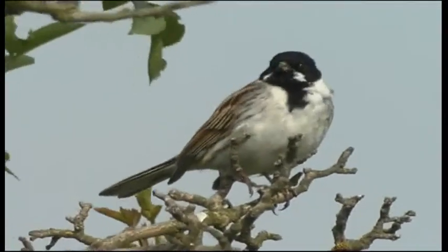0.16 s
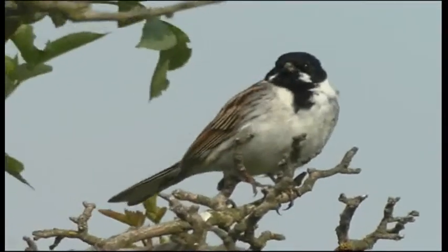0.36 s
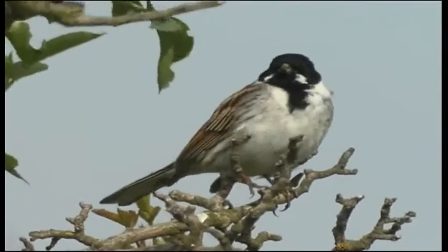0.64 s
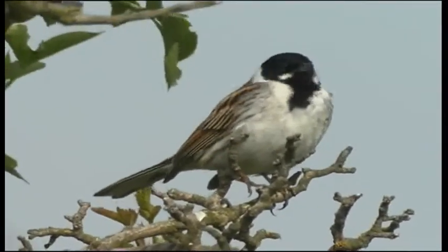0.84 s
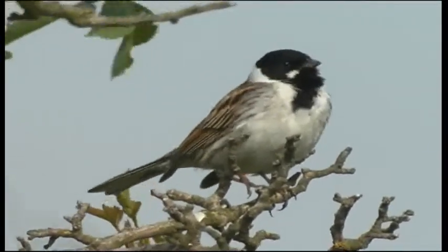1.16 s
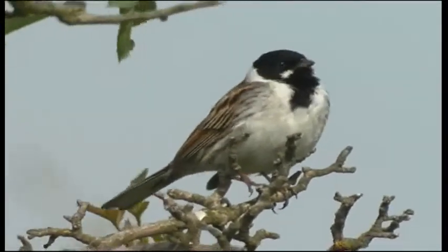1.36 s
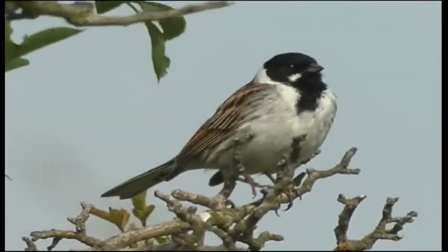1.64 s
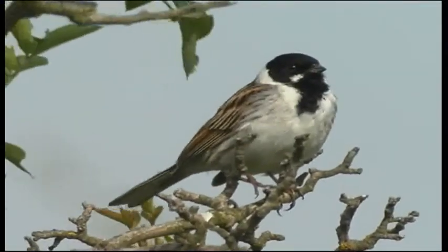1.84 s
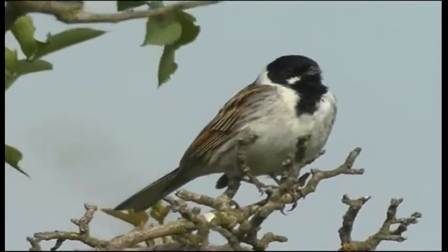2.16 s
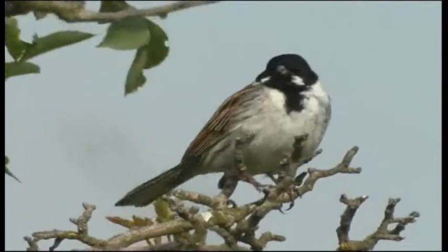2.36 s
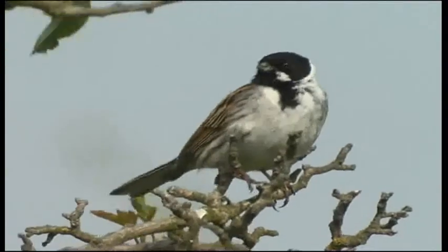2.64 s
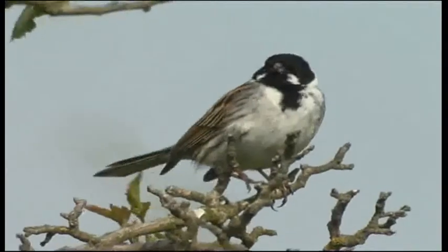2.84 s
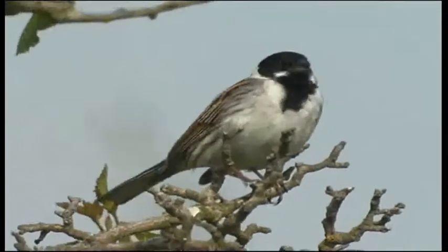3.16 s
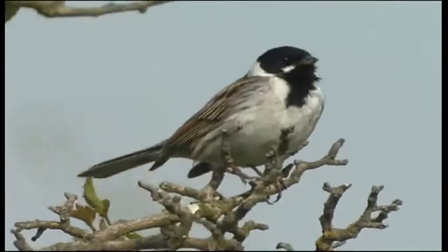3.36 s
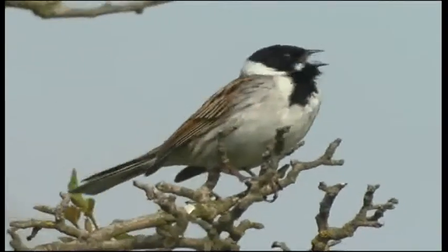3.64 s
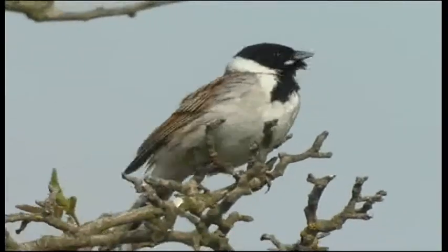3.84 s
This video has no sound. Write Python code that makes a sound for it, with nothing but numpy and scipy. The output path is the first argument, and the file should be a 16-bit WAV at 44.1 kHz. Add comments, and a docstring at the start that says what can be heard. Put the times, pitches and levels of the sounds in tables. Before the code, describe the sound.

A small bird close by on a hedge top gives two thin, high falling calls about two seconds apart, then a louder rasping buzz; faint far chirps, low wind rumble and hiss, open air, distant-feeling microphone.

```python
"""Light wind rumbles over a distant rush that swells slowly, with a steady hiss, all shaped noise; dry rustles tick.
A small bird on a hedge top gives two thin falling calls, about two seconds apart: a sine whistle slides down
while a second sine scoops up under it. Between the calls, during the second and at the end of the buzzing note,
other birds chirp faintly from far off in short, mostly trilled slides. That note is the near bird's last and
louder one, a fast pitch trill that ends on a clear tone."""
import sys
import numpy as np
from scipy import signal
from scipy.fft import rfft, irfft, next_fast_len
from scipy.io import wavfile
from scipy.ndimage import map_coordinates

SR = 44100
rng = np.random.default_rng(int(sys.argv[2]) if len(sys.argv) > 2 else 0)


def dump(signal):
    """Clip the signal to [-1, 1] and save it as 16-bit WAV at the path in sys.argv[1]."""
    limited = np.clip(np.atleast_2d(signal).T, -1, 1)
    pcm = np.round(limited * 32767).astype(np.int16)
    wavfile.write(sys.argv[1], SR, pcm)


N = 176400  # samples: four seconds
T = np.arange(N) / SR


def amp(db):
    """Decibels to gain."""
    return 10 ** (np.asarray(db) / 20)


def unit(x):
    """Scale to rms 1."""
    return x / np.sqrt(np.mean(x ** 2) + 1e-20)


def curves(rows, t):
    """Each column after the time, read at times t."""
    knot_times, *columns = np.transpose(rows)
    return [np.interp(t, knot_times, column) for column in columns]


def wobble(rate):
    """A smooth random curve, rate knots a second."""
    knots = rng.standard_normal(int(N * rate / SR) + 4)
    return map_coordinates(knots, [T * rate])


def filtered(x, response):
    """x with its spectrum multiplied by a response of frequency, padded by at least half a second."""
    size = next_fast_len(N + SR // 2)
    hz = np.fft.rfftfreq(size, 1 / SR)
    return irfft(rfft(x, size) * response(hz), size)[:N]


def noise(colour):
    """White noise shaped to a (Hz, dB) spectrum, then scaled to rms 1."""
    knot_hz, knot_db = np.transpose(colour)

    def response(hz):
        return amp(np.interp(np.log(hz + 1), np.log(knot_hz), knot_db))

    return unit(filtered(rng.standard_normal(N), response))


def gate(t, length, attack, release):
    """Smooth attack, hold and release between t = 0 and length."""
    ramp = np.minimum(t / attack, (length - t) / release)
    return np.sin(np.pi / 2 * np.clip(ramp, 0, 1)) ** 2


def voice(hz, jitter):
    """One side of the syrinx: a sine of rms 1 whose pitch trembles by the share jitter."""
    trembling_hz = hz * (1 + jitter * wobble(700))
    phase = 2 * np.pi * np.cumsum(trembling_hz) / SR
    return np.sqrt(2) * np.sin(phase)


# Wind rumble over time. Each row: time in seconds, level in dB before the unsteadiness.
WIND_LEVEL = [(0, -51), (.18, -49), (.29, -47.5), (.5, -52.5), (1.0, -53.5), (1.27, -52), (1.65, -53),
              (1.92, -50.5), (2.27, -55.5), (2.43, -52), (2.6, -56.5), (2.8, -55), (3.1, -57.5),
              (3.5, -61.5), (4, -54)]
# Tone of the rumble. Each row: frequency in Hz, relative level in dB.
WIND_COLOUR = [(20, -32), (45, -30.5), (70, -25), (100, -12), (130, -4), (160, -1), (200, 2.5), (270, -6),
               (340, -5), (450, -14.5), (800, -17), (3000, -64)]
# Brighter puffs of wind. Each row: time of the crest in seconds, half width in seconds, crest level in dB.
PUFFS = [(.29, .035, -48), (.35, 0.33, -59), (1.25, 0.22, -56.5)]
# Tone of the puffs. Each row: frequency in Hz, relative level in dB.
PUFF_COLOUR = [(20, -55), (200, -23), (340, -6), (500, -13), (700, -36), (2000, -50)]
# The distant rush over time. Each row: time in seconds, level in dB before the unsteadiness.
RUSH_LEVEL = [(0, -57), (1.0, -57.5), (1.7, -55), (2.3, -56), (2.8, -54.5), (3.3, -51), (4, -47.5)]
# Tone of the rush. Each row: frequency in Hz, relative level in dB.
RUSH_COLOUR = [(20, -36), (60, -23), (130, 0.5), (300, -4), (750, -2), (1200, -5.5), (2000, -13.5),
               (3500, -17), (7000, -24.5), (12000, -56)]
# Tone of the steady hiss. Each row: frequency in Hz, relative level in dB.
HISS_COLOUR = [(20, -23), (300, 0.5), (2000, 0.5), (4000, -1.5), (6300, -5.5), (8500, -6), (10000, -10),
               (11000, -21.5)]
HISS_DB = -59


def air():
    """Shaped noise: unsteady wind rumble with brighter puffs, a swelling far rush and an even hiss."""
    wind_db = curves(WIND_LEVEL, T)[0] + 0.73 * wobble(16)
    wind = amp(wind_db) * noise(WIND_COLOUR)
    puff_swell = sum(amp(db) * np.exp(-((T - s) / width) ** 2) for s, width, db in PUFFS)
    puffs = puff_swell * noise(PUFF_COLOUR)
    rush_db = curves(RUSH_LEVEL, T)[0] + 0.15 * wobble(6.19)
    rush = amp(rush_db) * noise(RUSH_COLOUR)
    return wind + puffs + rush + amp(HISS_DB) * noise(HISS_COLOUR)


# Faint dry rustles and ticks. Each row: start in seconds, length in seconds, level in dB.
RUSTLES = [(0.848, .02, -56.5), (0.869, .02, -55), (0.926, .035, -59), (1.201, .002, -51),
           (1.484, .012, -56.5), (1.503, .01, -57), (2.995, .005, -58), (3.063, .003, -50.5),
           (3.326, .085, -53.5)]
# Tone of the rustles. Each row: frequency in Hz, relative level in dB.
RUSTLE_COLOUR = [(100, -60), (1500, -27), (3500, 2), (7000, 5), (10000, -3.5), (12000, -31)]


def rustles():
    """Brief dry brushing at the perch: bright noise let through in short bursts."""
    bursts = sum(amp(db) * gate((T - s) / length, 1, 0.067, 0.23) for s, length, db in RUSTLES)
    return bursts * noise(RUSTLE_COLOUR)


# The falling calls. Each row: start in seconds, whistle level in dB, delay of the second voice in seconds,
# level of the second voice in dB before the softer first scoops.
FALLS = [(1.04, -31, .0715, -31.5), (3.235, -33, .0615, -31.5)]
# The whistle of one call. Each row: seconds from the call's start, pitch in Hz, level in dB relative to the call.
WHISTLE = [(0, 7250, -35), (.03, 6780, -17), (.05, 6420, -8), (.06, 6250, -8), (.072, 6050, -1.5),
           (.1, 5550, -3.5), (.128, 5150, -2), (.155, 4850, 0), (.178, 4700, -3), (.189, 4620, -20)]
# the second voice repeats a scoop at a fixed gap
SCOOP_COUNT = 6
SCOOP_GAP_S, SCOOP_S, SCOOP_RISE_S, SCOOP_ATTACK_S = .0154, .0135, .006, .0028
SCOOP_FROM_HZ, SCOOP_RISE_HZ = 3900, 1250  # start of the late scoops, and the climb they tend towards
FIRST_SCOOP_HZ, FIRST_SCOOP_DB, SETTLE_S = 900, -7, .028  # early scoops sit higher and softer, then settle
WHISTLE_JITTER, SCOOP_JITTER, FLUTTER_DB = 0.0023, .018, 0.8  # unsteadiness of pitch (share) and of level
COUPLED_JITTER = .015  # share added to the whistle's jitter while both voices sound


def falling_calls():
    """Two sides of the syrinx at once: one slides down while the other scoops up six times."""
    out = np.zeros(N)
    span = SCOOP_COUNT * SCOOP_GAP_S
    for start, db, delay, scoop_db in FALLS:
        whistle_hz, whistle_db = curves(WHISTLE, T - start)
        t = np.clip(T - start - delay, 0, span)  # time since the second voice came in
        within = t % SCOOP_GAP_S  # time within the current scoop
        early = np.exp(-t / SETTLE_S)
        both = gate(t, span, 0.01, .015)

        whistle = voice(whistle_hz, WHISTLE_JITTER + COUPLED_JITTER * both)
        whistle *= gate(T - start, WHISTLE[-1][0], .004, .004)
        out += amp(db + whistle_db + FLUTTER_DB * wobble(110)) * whistle

        climb = SCOOP_RISE_HZ * (1 - np.exp(-within / SCOOP_RISE_S))
        scoops = voice(SCOOP_FROM_HZ + FIRST_SCOOP_HZ * early + climb, SCOOP_JITTER)
        scoops *= gate(within, SCOOP_S, SCOOP_ATTACK_S, 0.0078)
        out += amp(scoop_db + FIRST_SCOOP_DB * early + FLUTTER_DB * wobble(200)) * scoops
    return out


# Short slurs and far chirps. Each row: start in seconds, length in seconds, first pitch in Hz, last pitch in Hz,
# (both before the trill), level in dB before the fade, trill depth in Hz.
CHIRPS = [(1.525, 0.1, 5660, 4500, -61, 313), (2.164, 0.058, 4600, 3790, -60, 150),
          (2.224, 0.041, 4920, 3850, -55, 170), (2.285, 0.047, 4830, 3820, -55.5, 172),
          (2.722, 0.021, 5370, 6650, -61, 50), (2.733, 0.092, 4660, 4160, -52.5, 230),
          (2.809, .022, 4040, 3500, -52.5, 60), (3.236, 0.038, 6400, 5120, -52.5, 123),
          (3.283, .025, 3170, 3480, -55, 25), (3.306, 0.038, 3600, 3890, -46, 27),
          (3.379, 0.058, 3680, 3200, -57.5, 29), (3.84, .006, 6700, 5480, -44.5, 0)]
CHIRP_TRILL_HZ, CHIRP_FADE_DB = 139, 5  # trill rate, and the level lost over each chirp
CHIRP_BEND, CHIRP_JITTER = 3, .02  # curvature of the slide, and pitch unsteadiness (share)


def chirps():
    """Faint sine slides, mostly trilled, that move fast at first and then level off."""
    out = np.zeros(N)
    for start, length, from_hz, to_hz, db, depth in CHIRPS:
        progress = np.clip((T - start) / length, 0, 1)
        slide = (1 - np.exp(-CHIRP_BEND * progress)) / (1 - np.exp(-CHIRP_BEND))
        trill = depth * np.sin(2 * np.pi * CHIRP_TRILL_HZ * (T - start))
        hz = from_hz + (to_hz - from_hz) * slide + trill
        level = amp(db - CHIRP_FADE_DB * progress) * gate(progress, 1, 0.11, .2)
        out += level * voice(hz, CHIRP_JITTER)
    return out


# The buzzing note, trilled in its middle. Each row: time in seconds, centre pitch in Hz, trill depth in Hz,
# level in dB before the trill's own swing.
BUZZ = [(3.689, 5100, 2, -51), (3.698, 5040, 0, -40.5), (3.712, 4740, 27.5, -26), (3.723, 4340, 429, -25.5),
        (3.741, 4167, 522, -25.5), (3.776, 3960, 548, -25), (3.8, 3870, 517, -28.5),
        (3.811, 3880, 264, -26.5), (3.816, 4160, 1, -17.5), (3.826, 4370, 1, -20.5),
        (3.841, 4427, 0, -22.5), (3.846, 4470, -2, -35)]
TRILL_HZ, TRILL_CREST_S = 134, 3.7625  # trill rate, and the time of one crest before its slight unsteadiness
TRILL_SWING_DB, TRILL_JITTER, TONE_JITTER = 7, 0.0055, 0.0011  # jitters are shares of the pitch
RASP_DB, RASP_JITTER, RASP_SWING_DB = -30, .035, 5.5  # rough octave of the trill, strongest in its troughs


def buzzing_note():
    """A fast rasping pitch trill, loudest at each crest of pitch, that settles into a clear tone."""
    hz, depth, db = curves(BUZZ, T)
    trilling = depth / depth.max()
    swing = np.cos(2 * np.pi * TRILL_HZ * (T - TRILL_CREST_S) + 0.21 * wobble(100))
    pitch = hz + depth * swing
    tone = amp(TRILL_SWING_DB * swing * trilling) * voice(pitch, TONE_JITTER + TRILL_JITTER * trilling)
    rasp = amp(RASP_DB - RASP_SWING_DB * swing) * trilling * voice(2 * pitch, RASP_JITTER)
    start, end = BUZZ[0][0], BUZZ[-1][0]
    return amp(db) * gate(T - start, end - start, .003, 0.0018) * (tone + rasp)


GROUND_S, GROUND_DB = .0103, -11  # echo delay, and its level relative to the bird


def ground_echo(x):
    """One softer, later copy off the ground: a pure delay, made as a phase turn in the spectrum."""
    return amp(GROUND_DB) * filtered(x, lambda hz: np.exp(-2j * np.pi * hz * GROUND_S))


HEDGE_T60 = 0.11  # seconds for the tail's decay term to fall by 60 dB
NEAR_WET_DB, FAR_WET_DB = -10.5, -3.5  # scatter relative to each source


def hedge(x):
    """A short diffuse scatter from twigs and leaves: convolution with a decaying noise tail."""
    t = T[:SR // 3]
    build_up = 1 - np.exp(-t / 0.0027)
    tail = rng.standard_normal(len(t)) * amp(-60 * t / HEDGE_T60) * build_up
    return signal.fftconvolve(x, tail / np.linalg.norm(tail))[:N]


def scene():
    """The open air and rustles, the near bird with its ground echo, and the faint chirps."""
    near = falling_calls() + buzzing_note()
    far = chirps()
    scatter = hedge(amp(NEAR_WET_DB) * near + amp(FAR_WET_DB) * far)
    return (air() + rustles() + near + ground_echo(near) + far + scatter)[None]


TOP_HZ = 10900


def record(dry):
    """A sharp band limit: nothing from TOP_HZ upwards passes."""
    return np.array([filtered(x, lambda hz: hz < TOP_HZ) for x in dry])


dry = scene()
out = record(dry)
dump(out)
```